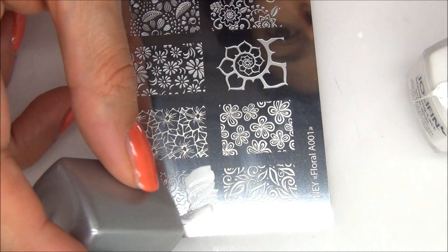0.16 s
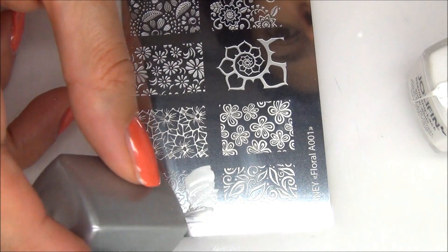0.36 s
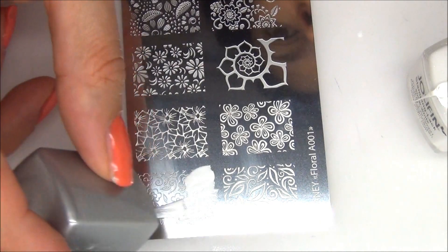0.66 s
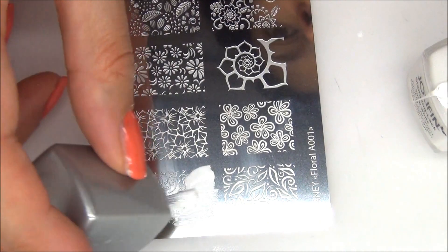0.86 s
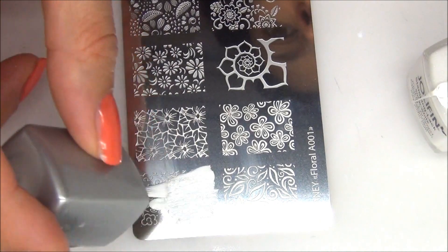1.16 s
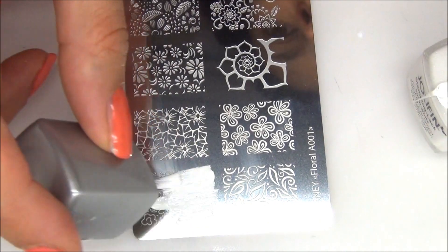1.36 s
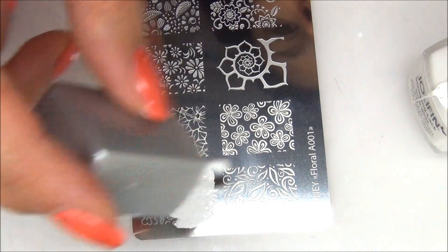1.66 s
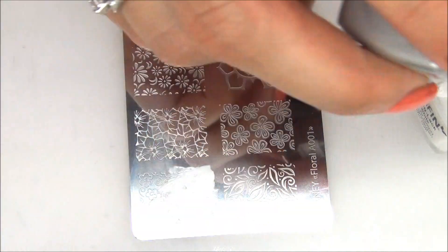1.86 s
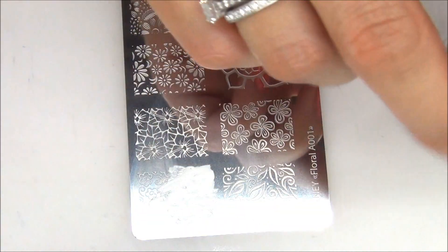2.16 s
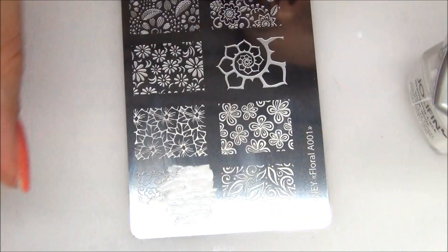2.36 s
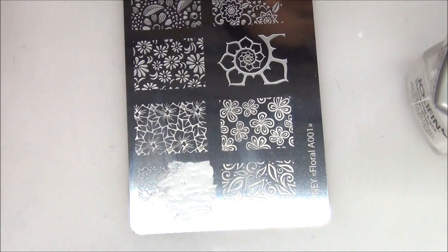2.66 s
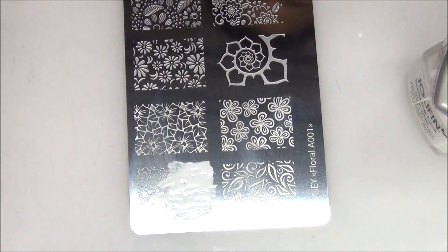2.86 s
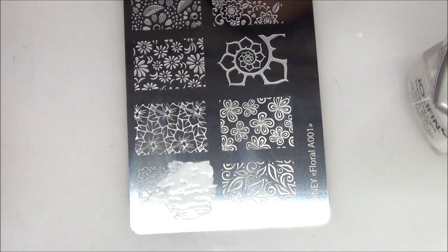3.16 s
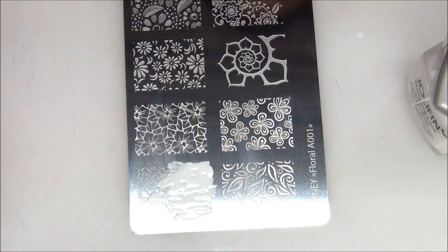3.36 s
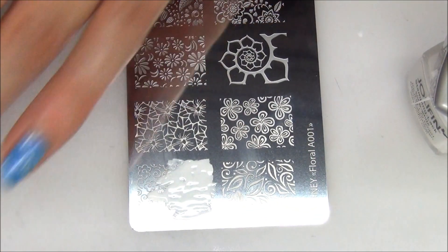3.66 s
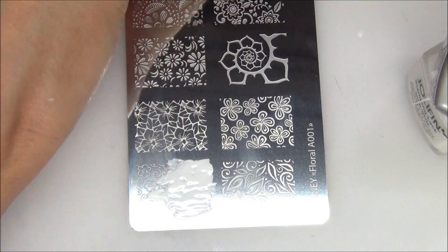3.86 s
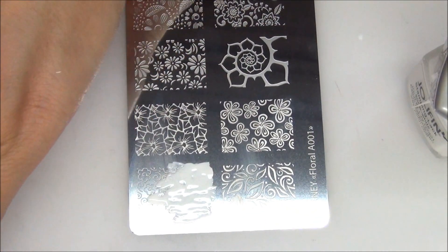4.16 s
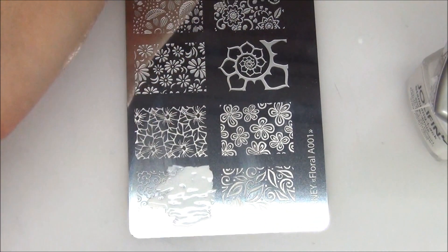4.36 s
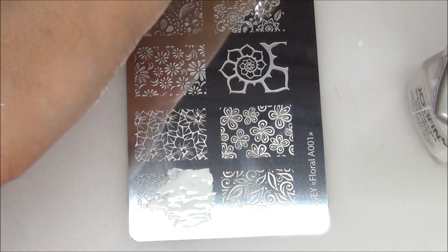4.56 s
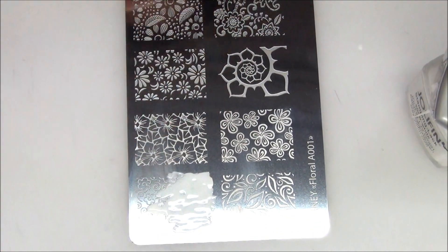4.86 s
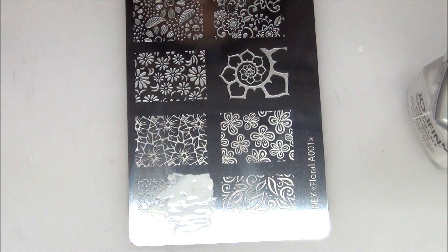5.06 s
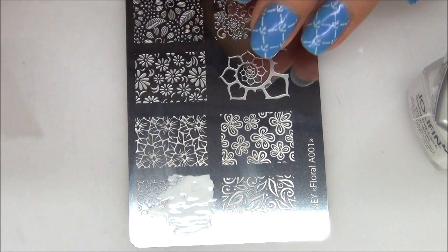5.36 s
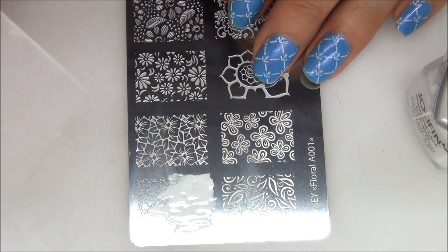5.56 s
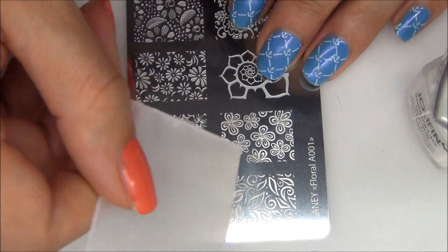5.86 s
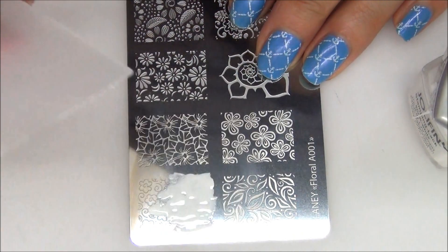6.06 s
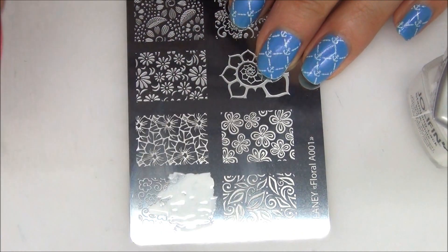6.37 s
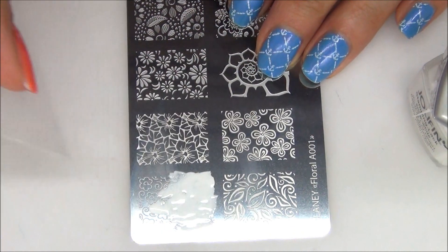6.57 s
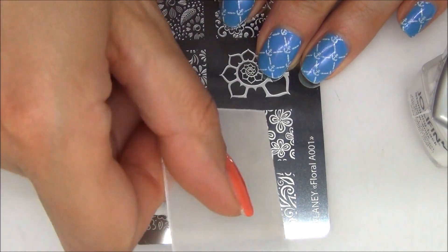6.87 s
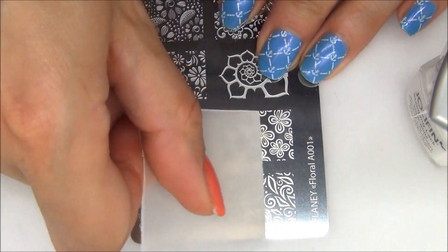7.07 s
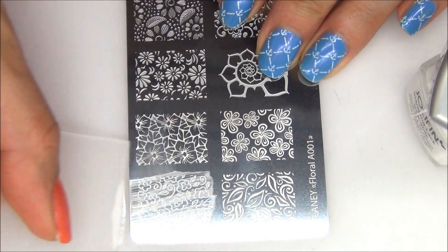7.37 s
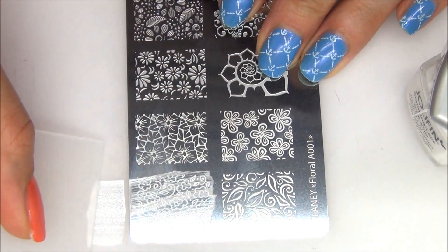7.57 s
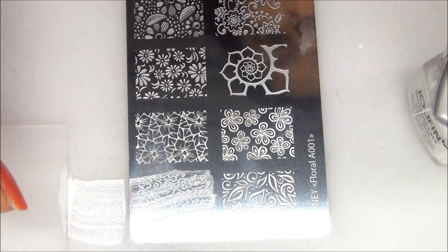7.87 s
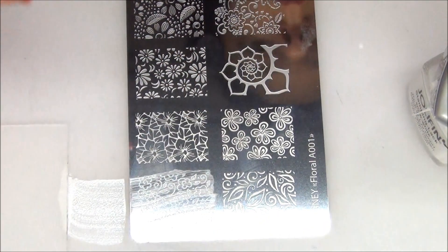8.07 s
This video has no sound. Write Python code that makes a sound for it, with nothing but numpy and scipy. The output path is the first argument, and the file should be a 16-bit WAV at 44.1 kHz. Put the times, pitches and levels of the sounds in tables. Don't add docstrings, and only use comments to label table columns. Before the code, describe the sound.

Close handling at a hard table: small objects thump down, a stiff card clatters and scrapes across a steel plate above faint whirring hiss.

```python
import sys
import numpy as np
from scipy import signal
from scipy.fft import rfft, irfft, next_fast_len
from scipy.io import wavfile
from scipy.ndimage import uniform_filter1d

SR = 44100
rng = np.random.default_rng(int(sys.argv[2]) if len(sys.argv) > 2 else 0)


def log_audio(samples):
    frames = np.atleast_2d(samples).T
    limited = np.clip(frames, -1, 1)
    pcm = np.round(limited * 32767).astype(np.int16)
    wavfile.write(sys.argv[1], SR, pcm)


def to_linear_factor(level_db):
    exponent = np.asarray(level_db, float) / 20
    return 10 ** exponent


N = 362061

# mode_hz, width_hz, level_db
PLATE_MODES = [(2050, 1300, 9.5), (3060, 990, 11.5), (4170, 820, 6.5), (5830, 1070, 8), (6530, 1400, 3)]
# mode_hz, width_hz, level_db
PLATE_TREBLE_MODES = [(9500, 3560, 7.5), (11020, 1930, 10), (13700, 1400, -29), (13400, 4200, -4)]
# mode_hz, width_hz, level_db
OBJECT_MODES = [(807, 44, -3), (480, 270, -9), (1014, 240, -9), (1510, 320, -9.5)]
# mode_hz, width_hz, level_db
TABLE_MODES = [(94, 29, -6.5), (116, 25, 0.5), (165, 43, 3.5), (235.3, 35.7, 6), (297.7, 35, 5),
               (414, 183, -4)]

# start_s, peak_db, brightest_hz, treble_db, body_db
BOTTLE_CLICKS = [(0.8495, -30.5, 6010, -12, -22), (1.303, -35.5, 5990, -11, 0),
                 (0.629, -36.5, 5900, -9, -13), (1.073, -39, 5900, -10, -8), (1.498, -36.5, 5900, -5, 1),
                 (2.135, -39.5, 4200, -15, 23), (2.206, -33.5, 2600, -15, 12), (2.4677, -42.5, 2730, 3, 12),
                 (2.5098, -30, 2830, -6.5, 12), (2.8098, -35, 5570, -27, 1), (2.911, -13, 3400, -44, -6),
                 (2.9148, -20, 3600, -30, -9), (2.9552, -19.5, 3470, -6.5, -6),
                 (2.967, -29, 3180, -21, -19), (2.986, -22, 1970, -18, -5), (3.293, -24, 5770, -8.5, -4.5),
                 (3.4394, -45, 4020, -12, 4)]
# start_s, peak_db, brightest_hz, treble_db, body_db
CARD_CLICKS = [(3.8257, -11.5, 4200, -7.5, 0), (3.9395, -26, 3130, -20, -24), (4.058, -40, 2500, -15, -3),
               (4.0903, -33, 6660, -11, -20), (4.3811, -14, 2940, -17, -8.5), (4.4945, -19.5, 5770, -10, 2),
               (4.5012, -24, 2580, -25, -2), (4.5284, -28, 1600, -25, 7.5), (4.547, -26, 5960, -28, -25),
               (5.5439, -22, 5430, -9, -21), (6.4171, -10.5, 2860, -27, -1.5),
               (6.4245, -12, 2750, -14, -12), (6.4247, -19, 5900, -16, -30), (6.8823, -29.5, 3870, -5, 0),
               (6.908, -38.5, 2880, -12, -8), (6.9631, -41, 2850, -18, -14), (7.18, -25, 2480, -23, -5),
               (7.138, -49, 2600, -11, 11), (7.254, -41.5, 2580, -9, 5), (7.276, -41, 3000, -11, 5),
               (7.292, -42, 3900, -11, 5), (7.3158, -34, 2560, -20, 3), (7.3417, -36, 2770, -16, 7),
               (7.3889, -8.5, 3100, -7, -46), (7.7468, -32.5, 6270, -16, -7), (7.909, -16, 4360, -5.5, -12)]
# start_s, peak_db, treble_db
NAIL_TICKS = [(2.1684, -37, 6), (2.188, -26, 3), (3.7495, -38, 14), (4.6594, -44, 8), (4.675, -46, 15),
              (4.684, -48, 14), (4.6897, -39, 15.5), (4.698, -46, 12), (4.7063, -30.5, 4), (4.803, -45, 7),
              (4.812, -38.5, 9)]
NAIL_HZ, NAIL_BODY_DB = 4720, -29
BOTTLE_CLICK_T60_S, CARD_CLICK_T60_S, NAIL_T60_S = 0.023, 0.022, 0.013

# start_s, peak_db
DABS = [
    (.378, -47),
    (.629, -42),
    (.849, -42.5),
    (1.073, -46),
    (1.302, -52),
    (1.497, -41),
]
DAB_HZ, DAB_T60_S, DAB_BELOW_DB = 2280, 0.032, -15
# start_s, peak_db, mode_hz, t60_s, lower_mode_db
KNOCKS = [(2.135, -18.5, 2360, 0.027, -3.5), (2.2063, -26, 2380, 0.025, 2), (2.216, -20, 2340, 0.027, -2.5),
          (2.766, -36, 2900, 0.017, -4), (2.7645, -24, 2030, 0.0084, -12),
          (2.765, -27.5, 1020, 0.021, -1.5), (2.77, -38.5, 2040, 0.15, -15), (2.773, -32, 1800, 0.03, -10),
          (3.750, -28.5, 10230, 0.037, -11), (5.544, -29, 1960, 0.013, -16),
          (2.1685, -38, 4150, 0.008, -10), (2.188, -46, 2400, 0.018, -10), (4.3815, -35.5, 2300, 0.016, 6),
          (7.91, -28, 1040, 0.025, -20), (7.91, -19, 4240, 0.01, -13), (8.068, -36, 800, 0.039, -8),
          (8.083, -32.5, 1200, 0.027, -0.5)]
LOWER_MODE_RATIO, UPPER_MODE_RATIO = 0.65, 1.74
UPPER_MODE_DB, UPPER_T60_SHARE = -13, 0.47
GRIP_SHARE = 0.6

# start_s, length_s, peak_db, from_hz, to_hz
JUDDERS = [
    (7.367, 0.0082, -18, 2900, 2510),
    (7.3752, 0.0071, -13.5, 2700, 2990),
]
# start_s, peak_db, t60_s
HUMS = [
    (2.766, -29, .05),
    (3.826, -23, 0.099),
    (4.245, -37, 0.3),
    (4.384, -35, .1),
    (4.494, -39, .08),
    (6.42, -28, .08),
    (7.74, -38.5, 0.14),
]
HUM_HZ, HUM_RISE_S = 769, 0.005

# start_s, peak_db, push_hz, legs_db
BOTTLE_THUMPS = [(2.133, -15.5, 490, -7.5), (2.139, -20, 405, -11), (2.15, -29, 200, -13),
                 (2.19, -33, 300, -20), (2.21, -26.5, 160, -5), (2.238, -22, 165, -19),
                 (2.465, -32.5, 167, -9), (2.505, -26.5, 414, -15), (2.698, -33, 174, -21),
                 (2.764, -24, 380, -31), (2.772, -26, 400, -30), (2.81, -13.5, 176, -28),
                 (2.825, -18, 211, -35), (2.875, -29, 229, -20), (2.91, -11.5, 254, -15.5),
                 (2.916, -19, 198, -23), (2.924, -18, 201, -25), (2.954, -23, 262, -9),
                 (3.003, -23.5, 225, -31), (3.189, -25, 355, -40), (3.289, -28, 364, -34),
                 (3.309, -31, 320, -31)]
# start_s, peak_db, push_hz, legs_db
HAND_THUMPS = [(3.823, -17.5, 337, -19), (3.838, -28, 600, -22), (3.878, -30, 303, -25),
               (3.986, -35.5, 265, -10), (4.02, -35, 300, -18), (4.06, -41, 300, -14),
               (4.243, -30, 189, -27), (4.378, -31, 386, -14), (4.407, -27, 297, -17),
               (4.446, -29.5, 300, -17), (4.5, -27, 326, -19), (4.527, -24, 246, -8.5),
               (5.545, -37, 124, -20), (6.414, -20.5, 440, -18), (6.4174, -23.5, 693, -30),
               (6.424, -24.5, 279, -11), (6.488, -37, 595, -22), (6.498, -35, 650, -20),
               (6.512, -43, 600, -20), (6.902, -35.5, 136, -28), (7.382, -44, 70, 7.5),
               (7.462, -30.5, 240, -30), (7.478, -30.5, 240, -30), (7.617, -37.5, 134, -23),
               (7.661, -31.5, 125, -33), (7.908, -25, 265, -33), (8.082, -30, 196, -9.5)]
BOTTLE_THUMP_T60_S, HAND_THUMP_T60_S = 0.049, 0.081

# start_s, level_db, treble_db, lower_db
FLICKS = [
    (2.4965, -18.5, -5.5, 0),
    (4.455, -38, -2, -5),
    (4.4927, -12.5, -14, -3),
    (5.1174, -37, 5.5, -1),
    (6.4894, -38, -8, 2.5),
    (7.3664, -33, -3, -10),
    (7.8344, -32, -5, 3.5),
    (7.8474, -36, -7, -2),
    (8.0691, -27.5, -5.5, -1),
    (8.1244, -42, -4, -1),
]
# start_s, level_db, treble_db, lower_db
SKIDS = [(2.5144, -43.5, 9, 6), (2.9134, -27, -12, -24), (2.96, -17, -14, -6), (2.9846, -34.5, -27, 7),
         (3.8247, -24.5, -7, 0), (4.2423, -25.5, -3, -2.5), (4.382, -32, -10, 1), (4.5524, -24.5, -6, 0),
         (4.7067, -33.5, 4, 1), (6.4238, -30, -22, 6), (7.3881, -14.5, -2, -3.5), (7.43, -34, 0, -5),
         (7.465, -40, -3, -6)]
# start_s, level_db, treble_db, lower_db
STROKES = [(2.5294, -32.5, 0, -4.5), (2.5594, -44, -10, 2), (3.38, -36, -4, -0.5), (3.9195, -24, -7, 2),
           (3.9594, -34, -6, -1), (4.005, -32, -12, 1.5), (4.5894, -46, 8, -18), (4.6603, -39, 3, -8),
           (5.0594, -44.5, 3, -2), (5.62, -39.5, 2, -3), (5.71, -38, -5, -0.5), (6.05, -40.5, -1, -17),
           (6.2394, -53, -10, -12), (7.12, -36.5, -4, 2.5), (7.19, -45, -3, 0), (7.2694, -38, -7, 4),
           (7.3143, -38.5, -6, 6.5), (7.4194, -42, -8, 7), (7.723, -43.5, 1, 0)]
# start_s, level_db, treble_db, lower_db
SNAPS = [
    (4.5364, -9, -4.5, -3),
    (7.3664, -30, -2, 2),
]
# rise_s, rise_bend, fade_t60_s
FLICK_ENVELOPE = (0.01, 0.14, 0.083)
SKID_ENVELOPE = (.002, 0.42, 0.19)
STROKE_ENVELOPE = (0.044, 0.28, 0.14)
SNAP_ENVELOPE = (.014, 0.89, 0.035)

# start_s, held_s, rumble_db, rub_db
DRAGS = [(2.2, 0.033, -37.5, -54), (2.5, 0.062, -47.5, -50), (2.78, 0.016, -40.5, -51),
         (2.88, 0.17, -43, -61), (3.12, 0.13, -44.5, -56), (3.3, 0.11, -43.5, -49.5),
         (3.83, 0.12, -48.5, -51), (4.0, .4, -51.5, -54.5), (4.5, 0.05, -41.5, -67),
         (6.47, 0.016, -50.5, -48), (7.1, 0.17, -51.5, -59), (7.28, 0.075, -45, -48),
         (7.4, 0.061, -45, -56), (7.66, 0.067, -43, -53.5), (8.08, 0.06, -55, -51.5)]
DRAG_RISE_DB_PER_S, DRAG_FALL_DB_PER_S = 197, 121

# freq_hz, density_db
HISS_SPECTRUM = [(15, -45), (25, -15), (108, -7.5), (160, -8), (256, -4.5), (394, -12), (714, -10),
                 (887, -2), (1020, -9), (1190, -8), (2160, -14), (4030, -17), (5880, -20), (7310, -18.5),
                 (16000, -26)]
# freq_hz, density_db
HISS_SIDE_SPECTRUM = [(15, -32), (25, -2), (97, -1), (206, -6.5), (242, -4.5), (476, -11), (1020, -8),
                      (1100, -9), (2110, -24), (2690, -22), (4140, -26), (7310, -15), (14800, -36.5),
                      (16000, -50)]
HISS_DB, HISS_SIDE_DB = -49.5, -60.5
# mode_hz, width_hz, level_db
HOUSING_MODES = [(46.8, 2.5, -63.5), (105.3, 3.4, -63), (240, 7.2, -69.5), (3500, 570, -70.5),
                 (4080, 190, -62.5), (5210, 250, -68), (6800, 880, -64), (12350, 300, -71.5),
                 (15000, 3400, -70.5)]
# delay_ms, pitch_hz, t60_ms, peak_db
TURN_STRIKES = [(2.005, 6420, 28.5, -53), (40.1, 7400, 13, -49), (21.73, 7200, 38, -54.5),
                (8, 7500, 28, -53.5), (27.8, 7500, 17, -52.5), (38.9, 5100, 11.2, -56),
                (9.17, 4800, 28, -63), (13.6, 8250, 20, -58)]
TURN_HZ, SCAN_HZ, SCAN_DB = 25, 15625, -77
# time_s, pitch_hz
LOOSE_PITCH = [(0, 2690), (2.6, 2710), (3.0, 2900), (4.2, 3100), (5.4, 3090), (6.2, 2920), (7.0, 2800),
               (8.21, 2720)]
# time_s, level_db
LOOSE_LOW_LEVEL = [(0, -65), (2.2, -52), (2.6, -48.5), (6.3, -48), (7.0, -49), (8.21, -72)]

# mode_hz, width_hz, level_db
FAN_MODES = [(899.7, 52.5, -53), (1196, 70, -57), (1485, 30, -67), (560, 56, -65.5)]
# time_s, level_db
FAN_OPENING = [
    (0, -0.5),
    (3.8, 1),
    (4.1, -8),
    (4.8, -9.5),
    (5.25, -4.5),
    (5.4, 0.5),
    (6.41, -1.5),
    (6.45, 1.5),
    (7.1, -4),
    (8.21, -1),
]
ROOM_T60_S, ROOM_DB, ROOM_TOP_HZ = 0.15, -12, 1800
DUCK_S, DUCK_DB, REST_DB, RECOVER_DB_PER_S = 6.43, -8, -0.54, 2.5


def unit(x):
    return x / np.sqrt(np.mean(x ** 2))


def peak(x, db):
    return x * to_linear_factor(db) / np.max(np.abs(x))


def fade(t, t60_s):
    return np.exp(-np.log(1000) * t / max(t60_s, .003))


def add(track, start_s, piece):
    i = int(start_s * SR)
    track[i:i + len(piece)] += piece[:N - i]


def lowpass(x, hz):
    return signal.lfilter(*signal.butter(1, hz, fs=SR), x)


def reson(x, hz, width_hz):
    return signal.lfilter(*signal.iirpeak(min(hz, .45 * SR), hz / width_hz, SR), x)


def body(x, modes):
    out = 0
    for k, (hz, width_hz, db) in enumerate(modes):
        out = out + (-1) ** k * to_linear_factor(db) * reson(x, hz, width_hz)
    return out


def coloured(spectrum):
    hz, db = np.transpose(spectrum)
    size = next_fast_len(N)
    bin_hz = np.arange(size // 2 + 1) * SR / size
    gain = to_linear_factor(np.interp(np.log(bin_hz + 1), np.log(hz), db))
    return unit(irfft(rfft(rng.standard_normal(size)) * gain, size)[:N])


def grit(rate_hz, spread_db):
    size = to_linear_factor(spread_db * np.minimum(rng.exponential(size=N), 3))
    slips = rng.random(N) < rate_hz / SR
    return unit(slips * rng.standard_normal(N) * size)


def patchy(rate_hz, spread_db):
    hold = int(SR / rate_hz)
    steps = np.repeat(rng.standard_normal(N // hold + 1), hold)
    return to_linear_factor(spread_db * unit(uniform_filter1d(steps, hold)[:N]))


def clicks():
    out, t = np.zeros(N), np.arange(6000) / SR
    tick = (t == 0) * 9.
    rows = [(*row, BOTTLE_CLICK_T60_S) for row in BOTTLE_CLICKS]
    rows += [(*row, CARD_CLICK_T60_S) for row in CARD_CLICKS]
    rows += [(s, db, NAIL_HZ, treble_db, NAIL_BODY_DB, NAIL_T60_S) for s, db, treble_db in NAIL_TICKS]
    for start_s, db, hz, treble_db, body_db, t60_s in rows:
        noise = rng.standard_normal(len(t))
        chatter = reson(body(noise * fade(t, t60_s), PLATE_MODES), hz, 0.66 * hz)
        hard = reson(reson(tick, hz, 0.59 * hz), hz, 0.7 * hz)
        mid = peak(hard, 0) + peak(chatter, -3.1)
        low = reson(body(tick + noise * fade(t, 4.1 * t60_s), OBJECT_MODES[:3]), 1140, 1330)
        low += 0.3 * reson(tick, 1540, 607)
        treble = body(0.096 * tick + noise * fade(t, 1.05 * t60_s), PLATE_TREBLE_MODES)
        add(out, start_s, peak(mid, db) + peak(treble, db + treble_db) + peak(low, db + body_db))
    return out


def knocks():
    out, t = np.zeros(N), np.arange(9000) / SR
    rows = [(s, db, DAB_HZ, DAB_T60_S, DAB_BELOW_DB) for s, db in DABS] + list(KNOCKS)
    for start_s, db, hz, t60_s, lower_db in rows:
        push = (t == 0) + .12 * rng.standard_normal(len(t)) * fade(t, .015)
        grip = np.exp(-(t / (GRIP_SHARE * t60_s)) ** 4)
        modes = ((1, 0, 1), (LOWER_MODE_RATIO, lower_db, 1),
                 (UPPER_MODE_RATIO, UPPER_MODE_DB, UPPER_T60_SHARE))
        for ratio, mode_db, t60_share in modes:
            mode_hz = ratio * hz
            width_hz = np.log(1000) / np.pi / max(t60_share * t60_s, .004)
            soft = reson(push, mode_hz, 0.19 * mode_hz)
            add(out, start_s, peak(reson(soft, mode_hz, width_hz) * grip, db + mode_db))
    return out


def judders():
    out, t = np.zeros(N), np.arange(9000) / SR
    for start_s, length_s, db, from_hz, to_hz in JUDDERS:
        noise = rng.standard_normal(len(t))
        along = np.clip(t / length_s, 0, 1)
        squeak = np.sin(2 * np.pi * np.cumsum(from_hz + (to_hz - from_hz) * along) / SR)
        rough = squeak + 0.46 * unit(reson(noise, 2100, 1200)) + 0.2 * unit(reson(noise, 3300, 900))
        swell = np.clip(along / 0.29, 0, 1) * fade(np.clip(t - length_s, 0, None), 0.0095)
        add(out, start_s, peak(rough * swell, db))
    return out


def hums():
    out, t = np.zeros(N), np.arange(9000) / SR
    tone = np.sin(2 * np.pi * HUM_HZ * t) * np.clip(t / HUM_RISE_S, 0, 1)
    for start_s, db, t60_s in HUMS:
        add(out, start_s, to_linear_factor(db) * tone * fade(t, t60_s))
    return out


def thumps():
    out, t = np.zeros(N), np.arange(10000) / SR
    rows = [(*row, BOTTLE_THUMP_T60_S) for row in BOTTLE_THUMPS]
    rows += [(*row, HAND_THUMP_T60_S) for row in HAND_THUMPS]
    for start_s, db, hz, legs_db, t60_s in rows:
        push = np.sin(2 * np.pi * hz * t) * (t < .5 / hz)
        rattle = rng.standard_normal(len(t)) * fade(t, 1.28 * t60_s)
        top = peak(reson(push, hz, 3.7 / max(t60_s, .01)), 0)
        top += peak(body(push, TABLE_MODES), -22)
        top += peak(body(rattle, TABLE_MODES[1:]), -4)
        legs = reson(reson(push + .5 * rattle, 102.5, 15.7), 53, 67)
        add(out, start_s + 0.00212, peak(top, db) + peak(legs, db + legs_db))
    return out


def scuffs():
    mid, treble, low = np.zeros((3, N))
    t = np.arange(14000) / SR
    kinds = ((FLICKS, FLICK_ENVELOPE), (SKIDS, SKID_ENVELOPE),
             (STROKES, STROKE_ENVELOPE), (SNAPS, SNAP_ENVELOPE))
    for slides, (rise_s, bend, t60_s) in kinds:
        rise = np.clip(t / max(rise_s, .001), 0, 1) ** bend
        shape = rise * fade(np.clip(t - rise_s, 0, None), t60_s)
        for start_s, db, treble_db, low_db in slides:
            add(mid, start_s, shape * to_linear_factor(db - 15))
            add(treble, start_s, shape * to_linear_factor(db - 15 + treble_db))
            add(low, start_s, shape * to_linear_factor(db - 15 + low_db))
    slips, fine = grit(22000, spread_db=4.0), grit(15000, spread_db=1.0)
    lower = unit(reson(body(slips, PLATE_MODES[:2]), 3860, 3500))
    lower += to_linear_factor(-2.0) * unit(body(slips, OBJECT_MODES))
    out = mid * patchy(160, spread_db=2.0) * unit(body(slips, PLATE_MODES[2:]))
    out += treble * patchy(200, spread_db=1.5) * unit(body(fine, PLATE_TREBLE_MODES))
    out += low * patchy(120, spread_db=2) * lower
    return out


def drag():
    t = np.arange(N) / SR
    rumble = unit(body(grit(700, spread_db=2.0), TABLE_MODES))
    rub = unit(body(grit(1500, spread_db=-1.0), OBJECT_MODES))
    rumble_gain, rub_gain = 0, 0
    for start_s, held_s, rumble_db, rub_db in DRAGS:
        lost_db = DRAG_RISE_DB_PER_S * np.clip(start_s - t, 0, None)
        lost_db += DRAG_FALL_DB_PER_S * np.clip(t - start_s - held_s, 0, None)
        rumble_gain = np.maximum(rumble_gain, to_linear_factor(rumble_db - lost_db))
        rub_gain = np.maximum(rub_gain, to_linear_factor(rub_db - lost_db))
    return rumble_gain * rumble + rub_gain * rub


def strikes(delay_ms, hz, t60_ms, db):
    turn, phase = np.divmod(np.arange(N) / SR * TURN_HZ + 1 - delay_ms * TURN_HZ / 1000, 1)
    since_s = phase / TURN_HZ
    size, detune = rng.standard_normal((N * TURN_HZ // SR + 4, 2))[turn.astype(int)].T
    ring = np.sin(2 * np.pi * hz * (1 + 0.012 * detune) * since_s) * fade(since_s, t60_ms / 1000)
    return to_linear_factor(db + 6 + 1.8 * size) * ring * np.clip(since_s / 0.0019, 0, 1)


def motor():
    t = np.arange(N) / SR
    out = to_linear_factor(HISS_DB) * coloured(HISS_SPECTRUM)
    out += to_linear_factor(SCAN_DB) * np.sin(2 * np.pi * SCAN_HZ * t)
    for hz, width_hz, db in HOUSING_MODES:
        out += to_linear_factor(db) * unit(reson(rng.standard_normal(N), hz, width_hz))
    for row in TURN_STRIKES:
        out += strikes(*row)
    loose_hz = np.interp(t, *np.transpose(LOOSE_PITCH))
    loose_low_db = np.interp(t, *np.transpose(LOOSE_LOW_LEVEL))
    out += strikes(1.5, loose_hz, 26, -51 - 5 * (t < 2.2))
    out += strikes(1.53, 1507, 22.0, loose_low_db)
    return out


def fan():
    out = np.zeros(N)
    for hz, width_hz, db in FAN_MODES:
        narrow = reson(rng.standard_normal(N), hz, width_hz)
        out += to_linear_factor(db) * unit(reson(narrow, hz, 2.0 * width_hz))
    return out * to_linear_factor(np.interp(np.arange(N) / SR, *np.transpose(FAN_OPENING)))


def room(near):
    t = np.arange(12000) / SR
    tails = rng.standard_normal((2, len(t))) * fade(t, ROOM_T60_S) * (t > .003)
    return [signal.fftconvolve(near, tail / np.linalg.norm(tail))[:N] for tail in tails]


def scene():
    t = np.arange(N) / SR
    near = clicks() + knocks() + judders() + hums() + thumps() + scuffs() + drag()
    wet, wide = room(near)
    scatter = np.gradient(near)
    ports = reson(reson(scatter, 7900, 5000)[::-1], 7900, 5000)[::-1]
    side = 0.39 * lowpass(near, 420) + .04 * near + 0.5 * ports
    side += to_linear_factor(-18) * reson(scatter, 18000, 5000) + to_linear_factor(-12) * reson(scatter, 1500, 3200)
    side += to_linear_factor(-25.5) * wide
    air = fan()
    floor = motor() + air
    floor_side = to_linear_factor(HISS_SIDE_DB) * coloured(HISS_SIDE_SPECTRUM) + 0.1 * air
    gain = to_linear_factor(np.where(t < DUCK_S, REST_DB, DUCK_DB + RECOVER_DB_PER_S * (t - DUCK_S)))
    mid = near + to_linear_factor(ROOM_DB) * lowpass(wet, ROOM_TOP_HZ) + gain * floor
    side = side + gain * floor_side
    return np.array([mid + side, mid - side])


def band_limit(x):
    return signal.sosfilt(signal.butter(12, 16820, fs=SR, output="sos"), x)


def record(dry):
    mix = signal.sosfilt(signal.butter(3, 36, "high", fs=SR, output="sos"), dry)
    mix = signal.sosfilt(signal.ellip(6, .5, 32, 15750, fs=SR, output="sos"), mix)
    mix = signal.sosfilt(signal.ellip(8, .2, 70, 16750, fs=SR, output="sos"), mix)
    return band_limit(mix)


dry = scene()
out = record(dry)
log_audio(out)
```